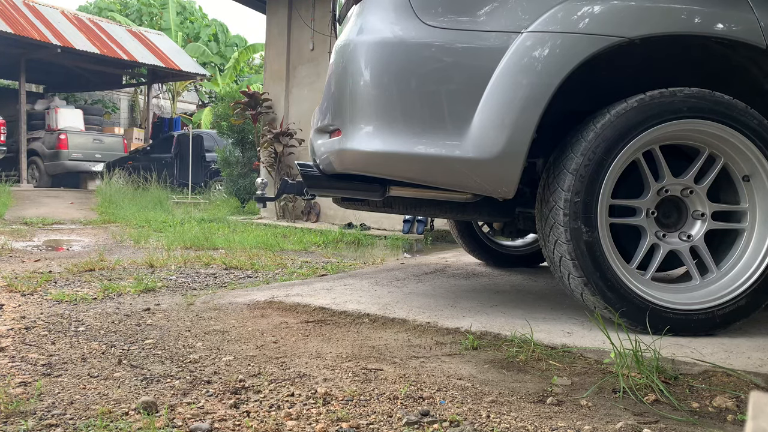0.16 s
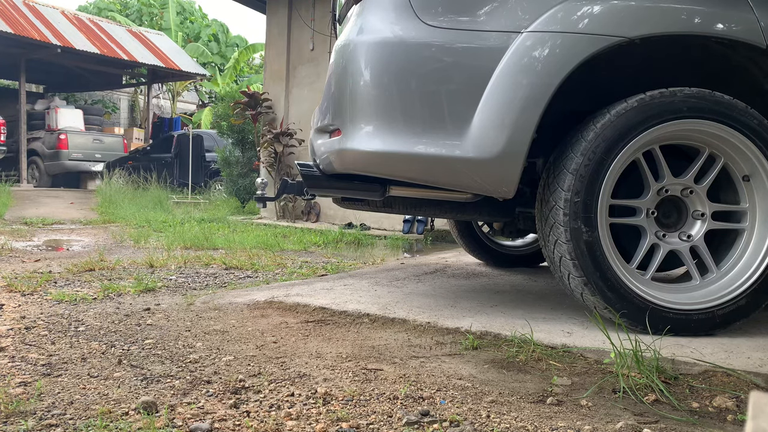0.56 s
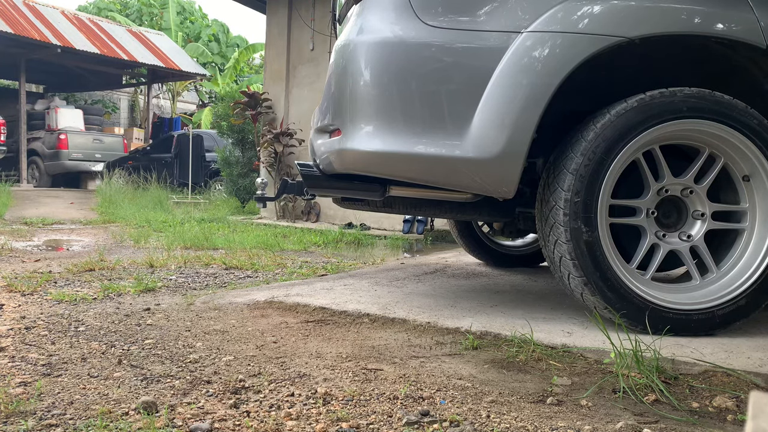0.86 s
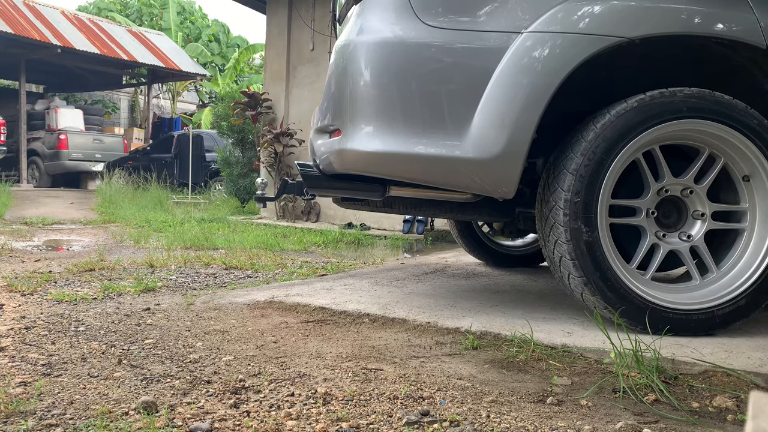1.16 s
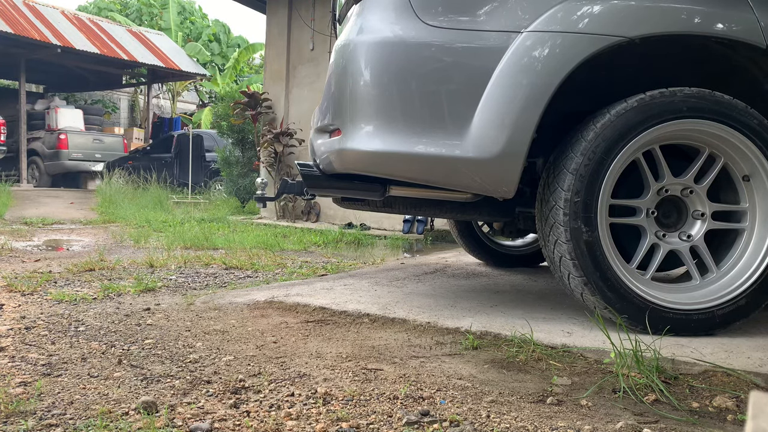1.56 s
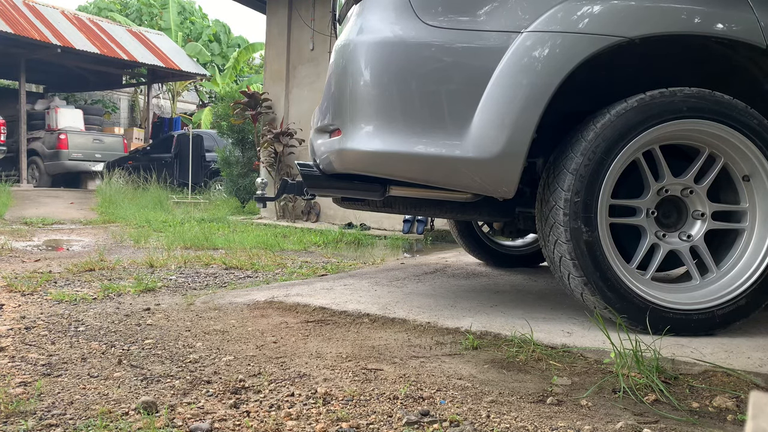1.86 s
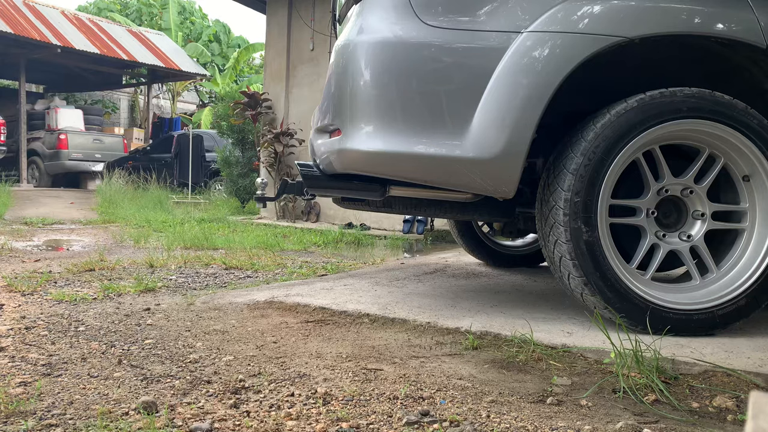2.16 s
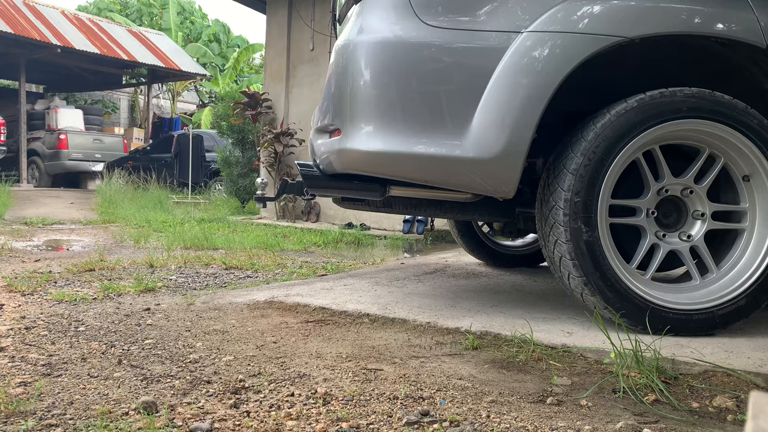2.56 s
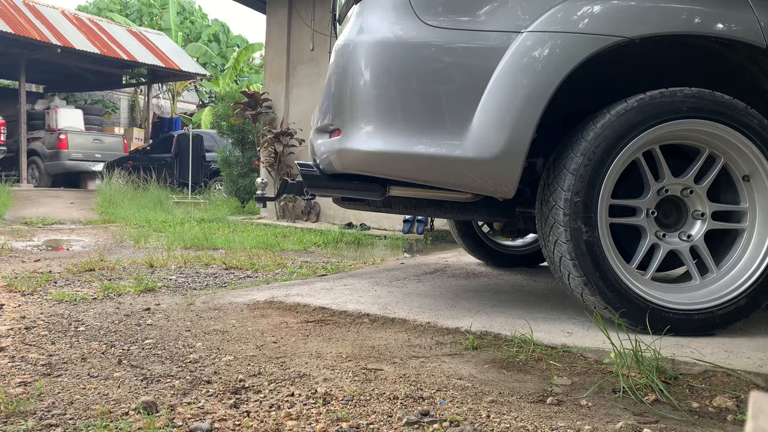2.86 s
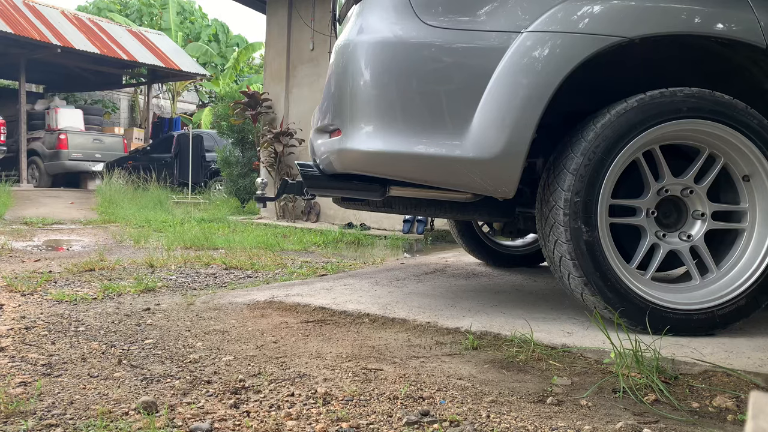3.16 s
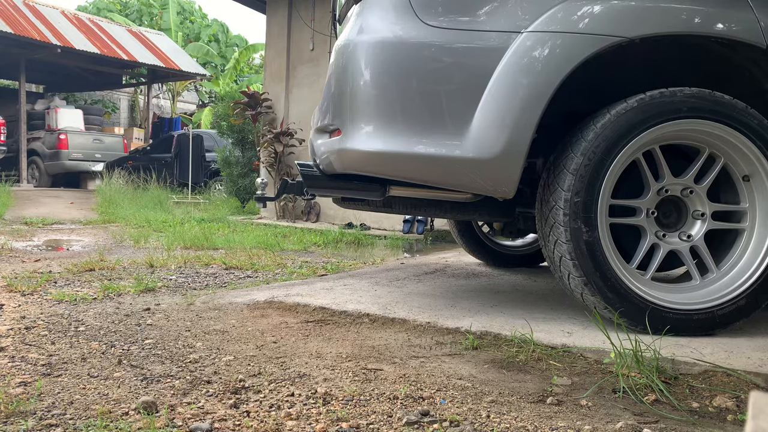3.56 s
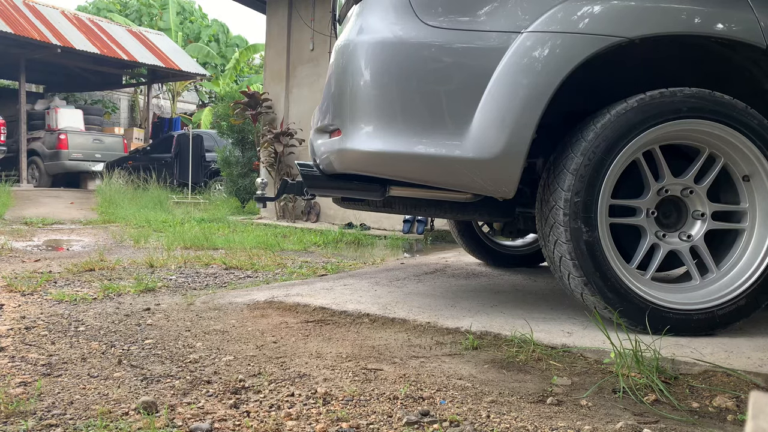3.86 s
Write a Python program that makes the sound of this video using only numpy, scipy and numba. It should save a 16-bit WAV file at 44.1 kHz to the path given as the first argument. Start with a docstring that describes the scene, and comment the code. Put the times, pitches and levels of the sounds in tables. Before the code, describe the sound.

A parked turbo-diesel car revs twice, with a throbbing exhaust, hiss and a thin high whine. After each rev the turbo howls downward, then the engine settles to a quiet idle. Heard outdoors, low near the tailpipe.

```python
"""Turbo-diesel blipped twice.

A parked four-cylinder revs twice and falls to idle, heard by a phone on the ground near the tailpipe.
Firings ring the pipe, gas hisses, the engine bay ticks and turbo blades whine high up. Off throttle the
slowing turbo howls in the exhaust; a low drone enters late. Two ports hear the treble slightly apart."""
import sys
import numpy as np
from scipy import signal
from scipy.fft import rfft, irfft, next_fast_len
from scipy.io import wavfile
from scipy.ndimage import uniform_filter1d
from numba import njit

SR = 44100
rng = np.random.default_rng(int(sys.argv[2]) if len(sys.argv) > 2 else 0)


def pcm_store(signal):
    """Save signal as 16-bit PCM."""
    levels = np.round(np.clip(np.atleast_2d(signal), -1, 1) * 32767)
    wavfile.write(sys.argv[1], SR, levels.astype(np.int16).T)


N = 176400
T = np.arange(N) / SR

# Engine speed. Each row: time in seconds, firing rate in Hz.
FIRING_RATE = [(0, 75.73), (.15, 85.44), (.25, 90.83), (.46, 78.2), (.7, 63.54), (.86, 58.27), (1.0, 70.43),
               (1.16, 86.03), (1.3, 95.85), (1.42, 96.04), (1.69, 78.64), (2.08, 58.47), (2.35, 45.2),
               (2.6, 38.84), (2.85, 31.06), (3.05, 28.19), (4, 27.77)]
# Exhaust drive. Each row: time in seconds, throb in dB, pulse gain in dB, pulse centre in Hz,
# gas rumble in dB.
EXHAUST_DRIVE = [(0, -17.5, -15.5, 230, -12), (.18, -40, -8, 267, -19), (.24, -55, -20, 270, -17.5),
                 (.29, -28.5, -21.5, 217, -16.5), (.5, -26, -27.5, 164, -20), (.83, -30, -25.5, 127.7, -26),
                 (.87, -52, -32, 131, -26), (.91, -25, -20.5, 151, -19), (1.18, -39, -10, 275.1, -24),
                 (1.3, -30, -16, 305, -14), (1.38, -34, -31, 230, -15.5), (1.7, -28, -25.5, 173.7, -21.5),
                 (2.1, -29, -25, 126.6, -26.5), (2.2, -37, -31.5, 128.9, -28.5),
                 (2.6, -57, -35.5, 127.7, -35), (3.0, -68, -37.5, 123.7, -41.5), (4, -66, -37.5, 126, -43)]
# Pipe resonances. Each row: centre in Hz, width in Hz, gain in dB.
PIPE_MODES = [(70.4, 39, -11), (125.4, 20.4, 9.5), (148.3, 70, -1.5), (244.6, 29.2, 1.5), (345.3, 38, -8.5),
              (467, 87, -12.5)]
# Gas rumble spectrum. Each row: frequency in Hz, relative density in dB.
RUMBLE_SPECTRUM = [(30, -29), (60, -9.5), (120, -3), (240, 2), (360, -4), (520, -7.5), (680, -13),
                   (780, -38)]
# Turbo blade noise. Each row: time in seconds, centre in Hz, width in Hz, level in dB.
BLADE_BAND = [(0, 12000, 1800, -35), (.14, 14700, 1200, -36), (.22, 17000, 1200, -55),
              (.44, 15000, 1800, -39), (.58, 14500, 1800, -46), (.75, 13500, 1500, -67),
              (.9, 13130, 1000, -60), (1.07, 15200, 900, -44), (1.17, 17050, 1013, -55),
              (1.5, 17300, 1801, -50), (1.72, 15000, 1820, -41), (1.9, 14380, 1400, -47),
              (2.05, 13290, 803, -62), (2.3, 11000, 900, -61), (2.55, 9552, 400, -70),
              (2.95, 7295, 200, -73), (3.3, 6200, 200, -84)]
# Gas hiss. Each row: time in seconds, then low, middle, high and top band levels in dB.
HISS_LEVELS = [(0, -22.5, -35, -33.5, -51), (.13, -29, -36, -40.5, -55), (0.299, -29, -46.5, -45.5, -49),
               (.86, -36.5, -52, -48, -52.5), (1.079, -30.5, -38.5, -41, -46), (1.34, -29, -40, -42.5, -50),
               (1.38, -24, -41.5, -42, -49), (1.62, -29.5, -47.5, -45, -44), (2.05, -36.5, -56.5, -49, -58),
               (2.45, -44.5, -62.5, -55.5, -67), (3.0, -49, -63, -64.5, -82), (4, -48, -59, -63, -78)]
# One spectrum per hiss band. Each row: frequency in Hz, relative density in dB.
HISS_SPECTRA = [
    [(500, -3), (750, 1), (1350, -3.5), (1750, -7), (2100, -7), (3200, -27)],
    [(1700, -38), (2500, 2), (3400, -0.5), (4300, -5.5), (7000, -27)],
    [(3200, -4.5), (4800, -3), (6500, 0.5), (8500, -4), (10000, 3.5), (12000, -2), (15000, -23)],
    [(10500, -10), (13000, -8), (16000, -5)],
]
# Engine-bay ticks. Each row: centre in Hz, width in Hz, idle level in dB, place in the cycle from 0 to 1.
TICK_MODES = [(1020, 90, -61.5, .4), (1690, 130, -57.5, .92), (3540, 110, -70, .14), (3300, 150, -69.5, .4)]
# Turbo howl, one table per throttle lift. Each row: time in seconds, pitch in Hz, level in dB.
HOWL_GLIDES = [
    [(.283, 598, -18), (.296, 580, -14), (.334, 548, -18), (.416, 525, -13.5), (.56, 492, -20),
     (.594, 478, -29), (.628, 468, -18), (.8, 422, -23), (.83, 400, -19), (.86, 380, -32)],
    [(1.36, 700, -30), (1.37, 700, -20), (1.455, 622, -20), (1.624, 553, -17), (1.796, 506, -16),
     (1.89, 480, -29), (1.956, 462, -19), (2.05, 442, -21), (2.21, 400, -22), (2.29, 381, -20),
     (2.34, 366, -30), (2.45, 338, -28), (2.56, 314, -26), (2.68, 292, -26), (2.76, 268, -32),
     (2.92, 232, -28), (3.13, 205, -41)],
]
# Late drone. Each row: time in seconds, pitch in Hz, tone level in dB, whir level in dB.
DRONE_GLIDE = [(3.28, 102.2, -56, -75), (3.38, 98.6, -32.5, -53), (3.67, 91.2, -41.5, -51),
               (3.72, 90.5, -42, -66), (4, 86.3, -37, -70)]
# Phone ports. Each row: frequency in Hz, right port's lead in radians, likeness from 0 to 1.
PORT_RESPONSE = [(0, 0, .98), (300, .1, .92), (550, .1, .84), (1300, .3, .6), (1700, -1, .6),
                 (2400, -1.5, .6), (2700, -1, .15), (5500, -1, .1), (6400, .2, .45), (8450, 3.1, .8),
                 (15700, 12.5, .8)]
# Engine bay, off to one side. Each row: frequency in Hz, right port's extra lead in radians.
BAY_PHASE = [(350, 0), (600, 2), (1450, 2), (1650, 0)]


def undb(db):
    """Decibels to gain."""
    return 10 ** (np.asarray(db) / 20)


def unit(x):
    """Scale to rms 1."""
    return x / np.sqrt(np.mean(x ** 2))


def curves(table):
    """Each column interpolated linearly over time."""
    rows = np.array(table, float)
    return [np.interp(T, rows[:, 0], column) for column in rows[:, 1:].T]


@njit
def bandpass(x, hz, width_hz):
    """State-variable band-pass with moving centre and width."""
    y, band, low = np.empty(len(x)), 0., 0.
    for i in range(len(x)):
        g, damping = np.tan(np.pi * hz[i] / SR), width_hz[i] / hz[i]
        v = (band + g * (x[i] - low)) / (1 + g * (g + damping))
        band, low, y[i] = 2 * v - band, low + 2 * g * v, damping * v
    return y


def double_bandpass(x, hz, width_hz, widen=1):
    """Two band-passes in series, the second `widen` times as wide."""
    hz, width_hz = hz * np.ones(N), width_hz * np.ones(N)
    return bandpass(bandpass(x, hz, width_hz), hz, widen * width_hz)


def band_noise(hz, width_hz, widen=1):
    """Band of noise, rms 1."""
    return unit(double_bandpass(rng.standard_normal(N), hz, width_hz, widen))


def wander(rate_hz):
    """Random steps smoothed twice, rms 1."""
    hold = int(SR / rate_hz)
    steps = np.repeat(rng.standard_normal(N // hold + 1), hold)
    return unit(uniform_filter1d(uniform_filter1d(steps, hold), hold)[:N])


def coloured_noise(spectrum):
    """Noise with the given spectrum, rms 1."""
    hz, db = np.array(spectrum, float).T
    bins_hz = np.arange(N // 2 + 1) * SR / N + 1
    gain = undb(np.interp(np.log(bins_hz), np.log(hz), db, left=-80, right=-80))
    return unit(irfft(rfft(rng.standard_normal(N)) * gain, N))


def pipe(x):
    """Exhaust resonances, summed with alternating sign."""
    one = np.ones(N)
    return sum((-1) ** k * undb(db) * bandpass(x, hz * one, width_hz * one)
               for k, (hz, width_hz, db) in enumerate(PIPE_MODES))


def exhaust(firings, firing_hz):
    """One soft pulse per firing rings the pipe, over a firing-rate throb and turbulent rumble."""
    throb_db, pulse_db, pulse_hz, rumble_db = curves(EXHAUST_DRIVE)
    onsets = np.flatnonzero(np.diff(firings.astype(int))) + 1
    scatter_db = 2.2 * rng.standard_normal(1000)[:len(onsets)]
    impulses = np.zeros(N)
    impulses[onsets] = undb(scatter_db) * SR / firing_hz[onsets] ** .5 / 10
    pulses = double_bandpass(impulses, pulse_hz, 1.53 * pulse_hz)
    throb = np.sqrt(2) * np.cos(2 * np.pi * firings) * undb(throb_db + 1.2 * wander(13))
    rumble = coloured_noise(RUMBLE_SPECTRUM) * undb(rumble_db + 1.3 * wander(15))
    return throb + pipe(pulses * undb(pulse_db)) + rumble


def blade_whine():
    """Noise band at the turbo's blade rate."""
    hz, width_hz, db = curves(BLADE_BAND)
    warped_hz = width_hz / np.sinc(2 * hz / SR)  # the filter narrows towards the top
    band = double_bandpass(rng.standard_normal(N), hz, warped_hz) * np.sqrt(SR / (0.92 * width_hz))
    return band * undb(db + 3 * wander(25))


def gas_hiss(firings):
    """Gas puffs once per firing. Returns the engine bay's low band and the tailpipe's upper bands."""
    depth, decay_firings, flicker_db = 0.41, 0.57, .7
    puff = unit(1 + depth * np.exp(-(firings % 1) / decay_firings))
    bands = [puff * coloured_noise(spectrum) * undb(db + flicker_db * wander(20))
             for spectrum, db in zip(HISS_SPECTRA, curves(HISS_LEVELS))]
    return bands[0], sum(bands[1:])


def bay_clatter(firings):
    """Each engine-bay mode ticks once per four firings, uneven in size, louder under load."""
    out, decay_cycles = 0, .2
    for hz, width_hz, db, place in TICK_MODES:
        cycles = firings / 4 + 1 - place
        strength = undb(2 * rng.standard_normal(200))[cycles.astype(int)]
        ticks = strength * np.exp(-(cycles % 1) / decay_cycles) * rng.standard_normal(N)
        out += undb(db) * unit(double_bandpass(ticks, hz, width_hz, widen=2))
    load_db = curves(HISS_LEVELS)[1]  # the middle hiss band stands for load
    return out * undb(.75 * (load_db - load_db[-1]))


def yard_rumble():
    """Steady low outdoor noise."""
    return undb(-41) * band_noise(hz=69, width_hz=38)


def turbo_howl(firings):
    """The slowing turbo's breathy tone, beaten by the firings; its hoarse overtones fade as it falls."""
    ramp_s, fade_db_per_hz, full_hz = 0.0064, 0.13, 683
    out, beat = 0, 2 * np.pi * firings
    for glide in HOWL_GLIDES:
        hz, db = curves(glide)
        gate = np.clip(np.minimum(T - glide[0][0], glide[-1][0] - T) / ramp_s, 0, 1)
        phase = 2 * np.pi * np.cumsum(hz * (1 + 0.00542 * wander(24.97))) / SR
        tone = np.sin(phase) + .32 * np.sin(phase + beat) + .22 * np.sin(phase - beat)
        for harmonic, gain_db, sine_gain in [(2, -11, 1), (3, -4, 0)]:
            sine = sine_gain * np.sin(harmonic * phase) * undb(2 * wander(20.1))
            rasp = band_noise(harmonic * hz, .16 * (harmonic - 1) * hz, widen=2)
            tone += undb(gain_db - fade_db_per_hz * (full_hz - hz)) * (sine + rasp / 2)
        breath = undb(-8.5) * band_noise(hz, .22 * hz)
        out += gate * undb(db + 1.5 * wander(30.32)) * (np.sqrt(2) * tone + breath)
    return out


def drone():
    """Low tone, sagging in pitch and wavering in level, with a faint whir above."""
    hz, db, whir_db = curves(DRONE_GLIDE)
    phase = 2 * np.pi * np.cumsum(hz) / SR
    tone = undb(db) * np.sin(phase) + undb(whir_db) * np.sin(6.6 * phase)
    return np.sqrt(2) * tone * undb(wander(10)) * (T > DRONE_GLIDE[0][0])


def phone_ports(near, bay, yard_t60_s=0.48):
    """Two ports hear the sources with a phase offset; yard scatter reaches them with opposite sign."""
    size = next_fast_len(N + SR)
    bins_hz = np.arange(size // 2 + 1) * SR / size
    hz, lead_rad, likeness = np.array(PORT_RESPONSE, float).T
    lead_rad, likeness = np.interp(bins_hz, hz, lead_rad), np.interp(bins_hz, hz, likeness)
    bay_rad = np.interp(bins_hz, *np.array(BAY_PHASE).T)
    tail = rng.standard_normal(SR // 2) * undb(-60 * T[:SR // 2] / yard_t60_s)
    scatter = rfft(tail / np.sqrt(np.sum(tail ** 2)), size)
    ports = []
    for side in (-1, 1):
        sources = rfft(near, size) + rfft(bay, size) * np.exp(.5j * side * bay_rad)
        paths = np.sqrt((1 + likeness) / 2) + side * np.sqrt((1 - likeness) / 2) * scatter
        ports.append(sources * np.exp(.5j * side * lead_rad) * paths)
    return irfft(np.array(ports), size)[:, :N]


def scene():
    """All sources in stereo, the engine timed by one running count of firings."""
    firing_hz = curves(FIRING_RATE)[0]
    firings = np.cumsum(firing_hz) / SR
    bay_hiss, pipe_hiss = gas_hiss(firings)
    near = exhaust(firings, firing_hz) + turbo_howl(firings) + blade_whine() + pipe_hiss
    near += bay_clatter(firings) + yard_rumble() + drone()
    return phone_ports(near, bay_hiss)


def record(dry):
    """The phone rounds the loudest peaks and cuts the top."""
    ceiling, cutoff_hz = .97, 15850
    rounded = dry / (1 + (dry / ceiling) ** 4) ** .25
    return signal.sosfilt(signal.ellip(10, .2, 80, cutoff_hz, fs=SR, output="sos"), rounded)


dry = scene()
out = record(dry)
pcm_store(out)
```